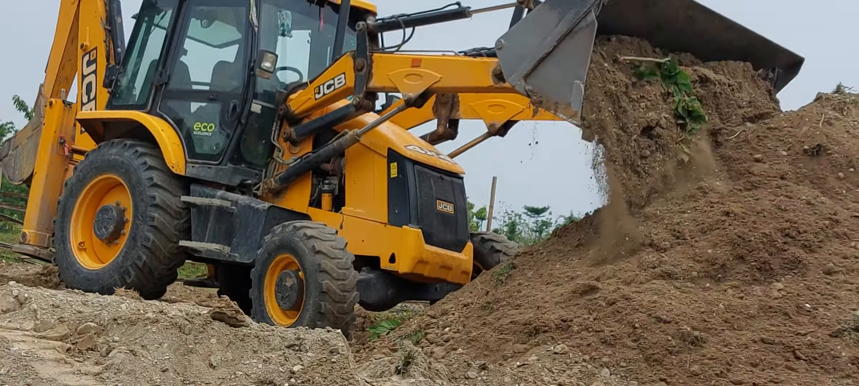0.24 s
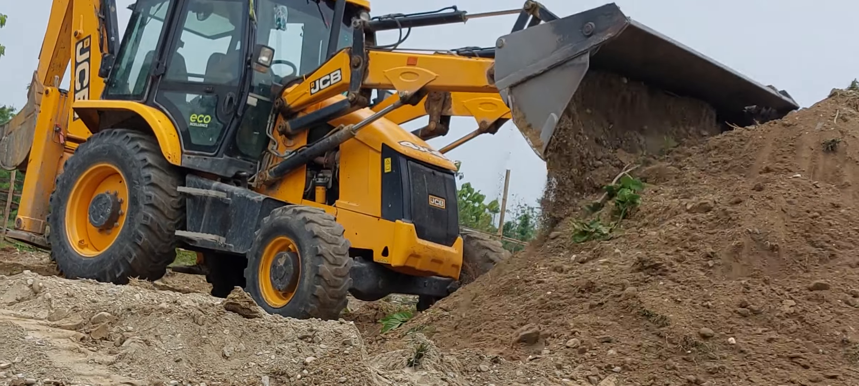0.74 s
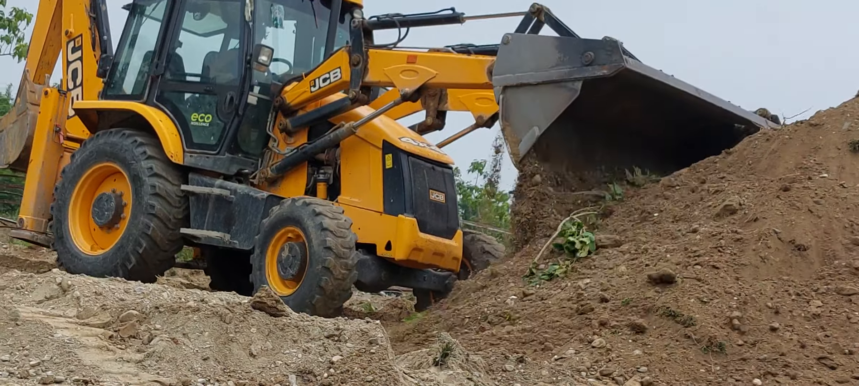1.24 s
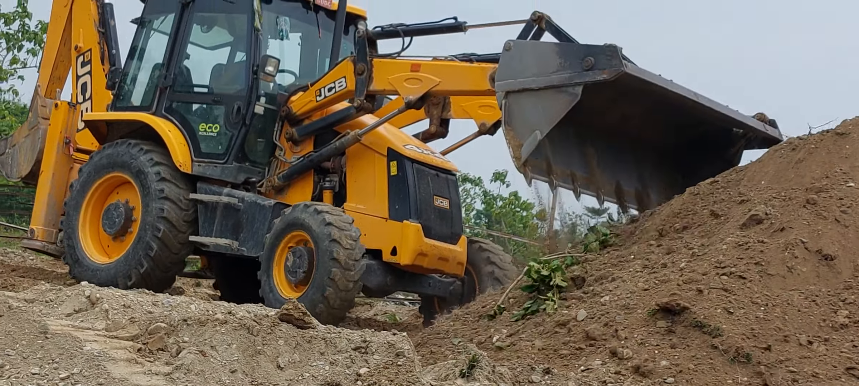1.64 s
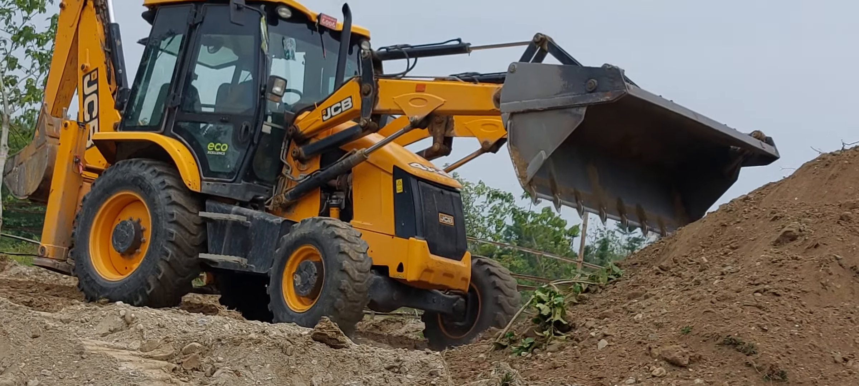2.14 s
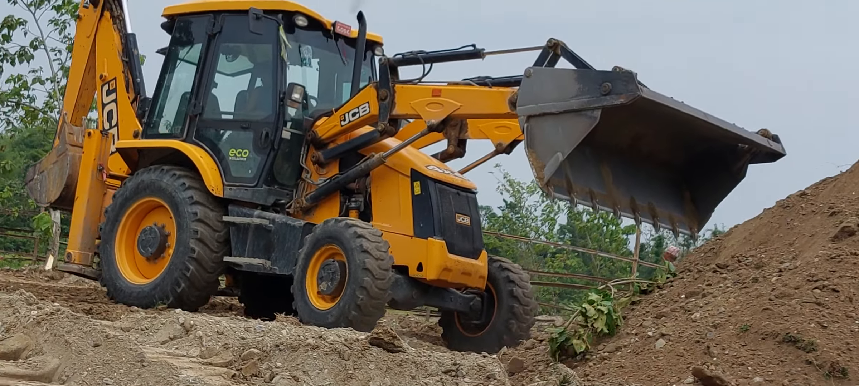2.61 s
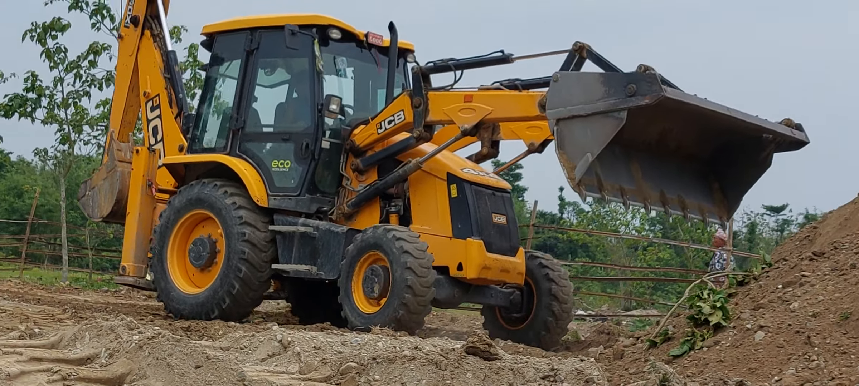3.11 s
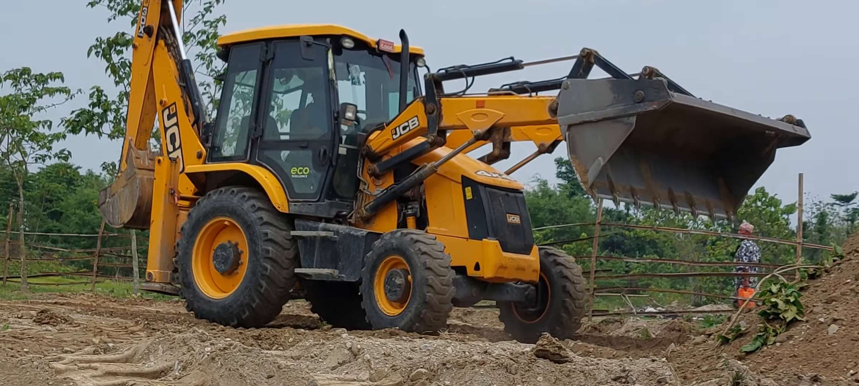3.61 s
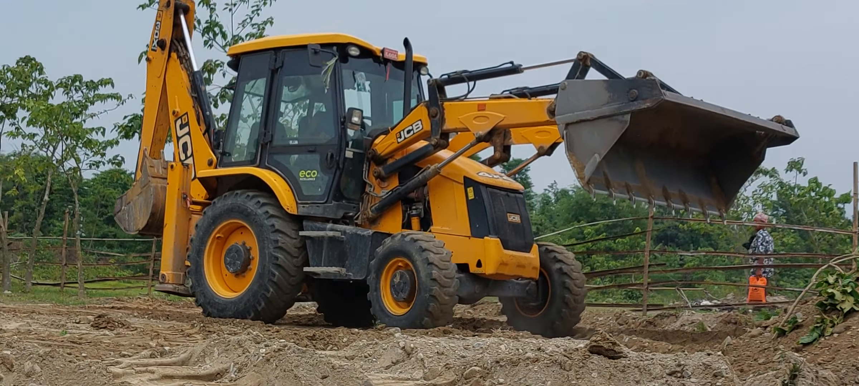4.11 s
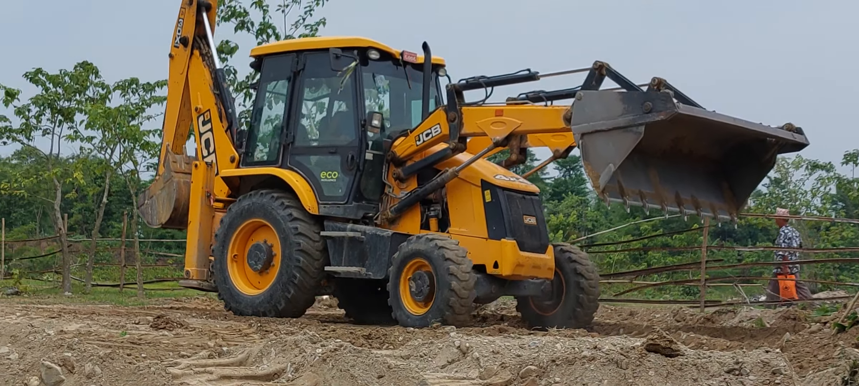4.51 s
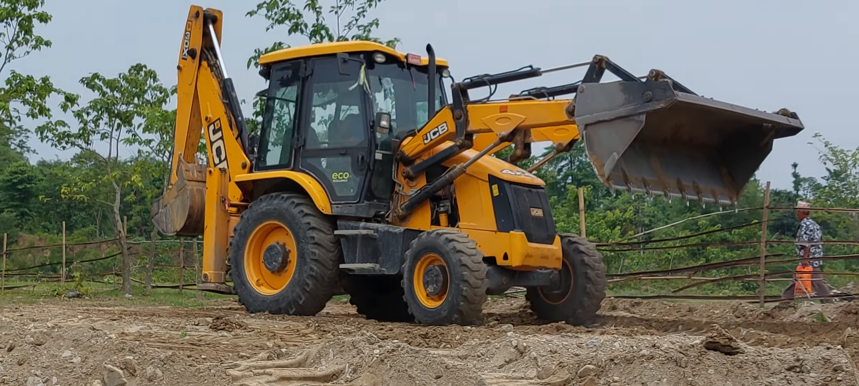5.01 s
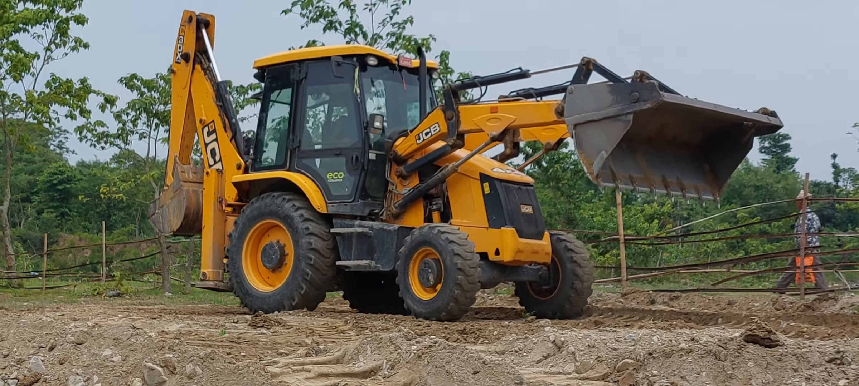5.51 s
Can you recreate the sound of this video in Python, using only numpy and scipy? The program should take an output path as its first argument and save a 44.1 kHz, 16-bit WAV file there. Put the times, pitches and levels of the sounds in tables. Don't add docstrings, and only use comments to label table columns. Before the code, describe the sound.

Outdoors, a diesel digger idles with a soft lumpy throb while dry soil hisses from its bucket, with pebble ticks, sharp stone clicks and pin clanks. At two seconds the engine surges with hard knocks and a rising turbo whistle, then roars steadily; two heavier clanks follow just after four seconds. Close, dry stereo from a small microphone.

```python
import sys
import numpy as np
from scipy import signal
from scipy.fft import rfft, irfft
from scipy.io import wavfile
from scipy.ndimage import uniform_filter1d

SR = 44100
rng = np.random.default_rng(int(sys.argv[2]) if len(sys.argv) > 2 else 0)


def ratio_of_db(decibels):
    return 10 ** (np.asarray(decibels, float) / 20)


def unload_audio(sound):
    columns = np.transpose(np.atleast_2d(sound))
    steps = np.round(np.clip(columns, -1, 1) * 32767)
    wavfile.write(sys.argv[1], SR, steps.astype(np.int16))


N = 253575
TIME = np.arange(N) / SR

# time in seconds, firing rate in Hz.
FIRING_RATE = [(0, 26.85), (0.85, 30.25), (1.2, 28.8), (1.55, 29.62), (2.03, 30.31), (2.15, 37.73),
               (2.35, 45.28), (2.6, 53.84), (2.85, 59.94), (3.05, 63.1), (3.4, 61.51), (4.05, 61.66),
               (4.35, 64.31), (4.65, 60.45), (5.25, 62.54), (5.75, 60.8)]
# time in seconds, load from 0 to 1.
ENGINE_LOAD = [(0, .03), (2.0, 0), (2.06, .52), (2.2, .87), (2.45, 1), (2.8, .93), (3.4, .57), (4.1, .57),
               (4.45, .4), (4.8, .6), (5.75, .52)]
# time in seconds, bearing (0 facing the heap, 1 backed away).
SWING = [
    (0, 0.011),
    (2.6, 0.017),
    (3.1, 0.39),
    (4.1, 0.62),
    (4.6, 0.85),
    (5.75, 1),
]


def evened(x):
    return x / np.sqrt(np.mean(x ** 2) + 1e-20)


def read(points, hz):
    f, *values = np.transpose(points)
    return [np.interp(np.log(hz + 1), np.log(f + 1), v) for v in values]


def played(rows, t=TIME):
    s, *values = np.transpose(rows)
    return [np.interp(t, s, v) for v in values]


def coloured(x, points):
    gain = ratio_of_db(read(points, np.fft.rfftfreq(len(x), 1 / SR))[0])
    return evened(irfft(rfft(x) * gain, len(x)))


def resonate(x, hz, width):
    turn = np.exp(2j * np.pi * np.cumsum(hz * np.ones(len(x))) / SR)
    r = np.exp(-np.pi * width / SR)
    return 2 * (turn * signal.lfilter([1 - r], [1, -r], x / turn)).real


def wander(size):
    once = uniform_filter1d(rng.standard_normal(N), size)
    return evened(uniform_filter1d(once, size))


def revving():
    return np.clip((played(FIRING_RATE)[0] - 33) / (60 - 33), 0, 1)


def level(idle_db, revs, revs_db, load_db, swing_db):
    return idle_db + revs_db * revs + load_db * played(ENGINE_LOAD)[0] + swing_db * played(SWING)[0]


def hydraulics():
    hum_db = -49 + 18 * revving() ** 0.25
    teeth_hz = 5.27 * played(FIRING_RATE)[0]
    hum = evened(resonate(rng.standard_normal(N), teeth_hz, 4.8))
    open_s, shut_s, ramp_s = .1, .63, .1
    valve = np.clip(.5 + np.minimum(TIME - open_s, shut_s - TIME) / ramp_s, .1, 1)
    oil = evened(resonate(rng.standard_normal(N), 4100, 150))
    return ratio_of_db(hum_db) * hum + ratio_of_db(-56) * valve * oil


def soil():
    # time in seconds, hiss level in dB.
    flow = [
        (0, -43),
        (.2, -52),
        (.35, -41.5),
        (.9, -49),
        (1.6, -47),
        (5.75, -84),
    ]
    # frequency in Hz, density in dB per Hz.
    grain_colour = [(400, -7), (1500, 13), (4000, 1.5), (6000, -3), (9000, -5), (12000, 4.5), (16000, -22)]
    hiss_db, = played(flow)
    pebbles_per_s = 260 * ratio_of_db(0.38 * (hiss_db + 41))
    size = ratio_of_db(5.8 * np.minimum(rng.exponential(1, N), 4))
    pebbles = size * (rng.random(N) < pebbles_per_s / SR)
    ticks = signal.oaconvolve(pebbles, np.exp(-np.arange(300) / 32.0))[:N]
    return ratio_of_db(hiss_db) * coloured(rng.standard_normal(N) * (1 + 0.5 * ticks), grain_colour)


def impacts(rows, share, t60):
    out, t = np.zeros(N + 8000), np.arange(8000) / SR
    contact = 13 * (np.arange(8000) == 40)
    for s, db, hz in rows:
        width = share * hz
        band = [(hz - width, -40), (hz - width / 2, -3), (hz, 0), (hz + width / 2, -3), (hz + width, -40)]
        rattle = evened(coloured(rng.standard_normal(8000) + contact, band))
        decay = ratio_of_db(db - 6 - 60 * t / t60)
        out[round(s * SR):][:8000] += decay * np.minimum(t / .0005, 1) * rattle
    return out[:N]


def stones():
    # time in seconds, peak level in dB, centre frequency in Hz.
    lip_hits = [
        (.058, -35, 6500),
        (.3, -20.5, 5000),
        (.398, -33, 5500),
        (.412, -20.5, 2500),
        (1.238, -35, 8100),
        (1.279, -29, 10800),
        (1.498, -43, 7000),
        (1.695, -33, 4000),
    ]
    return impacts(lip_hits, 0.94, 0.0092)


def linkage():
    # time in seconds, peak level in dB, centre frequency in Hz.
    slack_hits = [
        (.686, -30.5, 2030),
        (1.161, -29, 2340),
        (1.648, -29.5, 2300),
        (4.093, -31.5, 4000),
        (4.094, -24, 1100),
        (4.274, -26, 4700),
        (4.275, -25.5, 1140),
    ]
    return impacts(slack_hits, 0.73, 0.14)


def clods():
    # time in seconds, peak level in dB, centre frequency in Hz.
    drum_hits = [
        (.02, -35.5, 637),
        (.26, -38, 530),
    ]
    return impacts(drum_hits, 0.44, 0.53)


def hard_knocks():
    # time in seconds, peak level in dB.
    hard_blows = [(1.373, -33), (1.44, -35), (1.646, -21), (2.073, -28), (2.184, -26), (2.281, -23),
                  (2.326, -26), (2.454, -22), (2.532, -25), (2.59, -25.5), (2.753, -27)]
    return impacts([(s, db, 1210) for s, db in hard_blows], .38, 0.09)


def turbo_whistle(turns, load, revs, locked, puff_luck):
    # time in seconds, blade tone in Hz.
    blade_tone = [(0, 7500), (.7, 7400), (1.0, 7100), (1.25, 6720), (1.55, 6620), (2.02, 6400),
                  (2.08, 6750), (2.3, 7800), (2.75, 12000), (3.0, 13300), (3.25, 14000), (3.5, 14350),
                  (4.15, 14750), (4.45, 14380), (4.6, 14150), (5.22, 14400), (5.45, 14120), (5.75, 14100)]
    # frequency in Hz, level in dB.
    intake_duct = [(6520, -75), (6620, -55), (6740, -55), (7100, -68), (8700, -73), (12000, -68),
                   (14270, -67.5), (14390, -57), (14500, -67)]
    hz, = played(blade_tone)
    boost_db = 13 * load * (1 - .4 * revs)
    whistle_db = np.minimum(read(intake_duct, hz)[0] + boost_db, -53) + 4.5
    pulsing = np.minimum(1.3 * locked, 1)
    puff = (1 + pulsing * np.cos(2 * np.pi * (turns + .04))) ** 1.5 * ratio_of_db(1.5 * puff_luck)
    tone = np.sin(2 * np.pi * np.cumsum(hz) / SR)
    flutter = evened(resonate(rng.standard_normal(N), hz, 90))
    return ratio_of_db(whistle_db) * evened((tone + .6 * flutter) * puff)


def fan_roar(revs):
    # frequency in Hz, density in dB per Hz.
    fan_colour = [(300, -35), (600, -8), (800, -4.5), (1100, 2), (1700, 2), (2200, -4), (2900, -4.5),
                  (4000, -10.5), (5200, -15.5), (6800, -15.5), (9000, -23), (11000, -24.5), (13000, -24),
                  (16000, -15)]
    gusts = ratio_of_db(0.19 * wander(size=500) + 0.41 * wander(size=4000))
    roar_db = level(-41.5, revs ** 4.5, revs_db=6.5, load_db=2.5, swing_db=0.12)
    return ratio_of_db(roar_db) * coloured(rng.standard_normal(N), fan_colour) * gusts


def combustion_clatter(turns, rate, load, revs, locked, knock_luck):
    # frequency in Hz, width in Hz, level in dB.
    panel_modes = [(975, 69, -0.5), (1241, 136, 3), (1660, 350, 1), (2562, 86, -10), (2994, 240, -7.5),
                   (3840, 1100, -9.5), (6400, 2200, -10), (11400, 3800, -12)]
    since = ((turns + .2) % 1) / rate
    burst = (1 - np.exp(-since / 0.002)) * np.exp(-since / 0.005)
    gate = (1 - locked) * .3 + locked * burst * ratio_of_db(1.2 * knock_luck)
    gate = gate / np.sqrt(uniform_filter1d(gate ** 2, size=8000))
    knock = gate * rng.standard_normal(N)
    clatter = 0
    for hz, width, db in panel_modes:
        ring = resonate(resonate(knock, hz, 1.47 * width), hz, 1.47 * width)
        bright_db = 0.5 * (load - 0.56) * np.log2(hz / 1000)
        clatter = clatter + ratio_of_db(db + bright_db) * evened(ring)
    clatter_db = level(-42, revs, revs_db=1.1, load_db=8, swing_db=-3)
    return ratio_of_db(clatter_db) * evened(clatter)


def exhaust_rumble(turns, revs, locked):
    # frequency in Hz, density in dB per Hz.
    idle_gas = [(20, -37), (45, -13), (75, -10.5), (120, 0.5), (170, 0), (205, -6.5), (300, -12.5),
                (400, -17), (600, -23), (800, -31), (1100, -48)]
    rev_gas = [(20, -45), (45, -21), (70, -7.5), (95, -6.5), (130, -0.5), (200, 0.5), (330, -3.5),
               (450, -10.5), (620, -25), (800, -24.5), (1100, -57.5)]
    gas = rng.standard_normal((2, N)) * (1 + 0.13 * locked * np.cos(2 * np.pi * turns))
    rumble = np.sqrt(1 - revs) * coloured(gas[0], idle_gas) + np.sqrt(revs) * coloured(gas[1], rev_gas)
    swell = uniform_filter1d(rumble ** 2, size=2500)
    rumble = rumble / abs(swell + 0.25) ** 0.077
    rumble_db = level(-30.5, revs ** 0.21, revs_db=12.5, load_db=-4, swing_db=-2.5)
    return ratio_of_db(rumble_db) * rumble


def exhaust_beat(turns, rate, load, revs, beat_luck):
    # frequency in Hz, level in dB.
    pipe_response = [(28, -26), (36, -10), (46, -4), (60, -3), (90, 0), (130, 0), (188, 1), (212, -11),
                     (320, -11), (450, -24), (700, -40)]
    fall_db = -.5 + 3 * revs ** .3
    beat = 0
    for k in range(1, 16):
        order_db = read(pipe_response, k * rate)[0] - k * fall_db
        beat = beat + ratio_of_db(order_db) * np.cos(2 * np.pi * k * turns + .13 * (k - 2) ** 2)
    strength = ratio_of_db(0.13 * np.interp(turns, np.arange(400), beat_luck))
    return ratio_of_db(-38 + 23 * load) * strength * beat


def engine():
    rate, = played(FIRING_RATE)
    load, = played(ENGINE_LOAD)
    revs = revving()
    turns = np.cumsum(rate) / SR + .28
    locked = .6 + .55 * load - .6 * revs
    luck = rng.standard_normal((400, 3))
    firing = np.floor(turns + .2).astype(int)
    out = turbo_whistle(turns, load, revs, locked, luck[firing, 2]) + fan_roar(revs)
    out = out + combustion_clatter(turns, rate, load, revs, locked, luck[firing, 1])
    return out + exhaust_rumble(turns, revs, locked) + exhaust_beat(turns, rate, load, revs, luck[:, 0])


def scene():
    # frequency in Hz, dB at bearing 0, dB at bearing 1.
    housing_shadow = [(29.6, 0.5, 2), (498, -0.5, 1), (1090, 2, -1.5), (1710, -3.5, -7.5), (2500, 6, 1),
                      (3450, -10.5, 11.5), (4000, 4.5, 9.5), (5000, 10.5, 0), (5170, 13.5, 3),
                      (6500, 6.5, -30), (7240, -30, -11), (9300, -3.5, -4), (12800, 5, -3),
                      (14700, -5, -15)]
    # frequency in Hz, right lag in radians at bearing 0, radians at bearing 1, likeness 0 to 1.
    port_lag = [(30, .03, 0, .97), (250, .3, .05, .95), (600, .7, .1, .91), (1400, 1.7, .3, .85),
                (2100, 3.3, .45, .65), (2150, -2.9, .45, .65), (3050, -.4, .8, .78), (4500, 1.4, 2.9, .65),
                (5450, 3.2, 4.0, .5), (7850, 6.8, 6.8, .35), (11100, 9.3, 9.0, .45),
                (13300, 13.1, 13.1, .5), (15500, 16, 15.5, .3)]
    left = hydraulics() + soil() + stones() + linkage() + clods() + hard_knocks() + engine()
    hz, t, direct = signal.stft(left, SR, nperseg=512, noverlap=384)
    bearing = np.clip(played(SWING, t)[0], 0, 1)
    drift = rng.standard_normal(direct.T.shape).T
    drift = uniform_filter1d(uniform_filter1d(drift, size=7), size=7)
    drift = evened(uniform_filter1d(drift, size=4, axis=0))
    near_lag, far_lag, like = (c[:, None] for c in read(port_lag, hz))
    lag = near_lag + bearing ** 3 * (far_lag - near_lag)
    paths = like * np.exp(-1j * lag) + np.sqrt(1 - like ** 2) * np.exp(3j * drift)
    paths = paths / abs(paths) ** .8
    near_db = read(housing_shadow, np.outer(hz, 1 + 0.24 * bearing))[0]
    far_db = read(housing_shadow, np.outer(hz, 1 - 0.51 * (1 - bearing)))[1]
    right = direct * paths * ratio_of_db(near_db + bearing * (far_db - near_db))
    return np.array([left, signal.istft(right, SR, nperseg=512, noverlap=384)[1][:N]])


def low_pass(x):
    return signal.sosfilt(signal.butter(12, 15690, fs=SR, output="sos"), x)


def record(dry):
    bass_cut = signal.butter(2, 25, "high", fs=SR, output="sos")
    return low_pass(signal.sosfilt(bass_cut, dry))


dry = scene()
out = record(dry)
unload_audio(out)
```